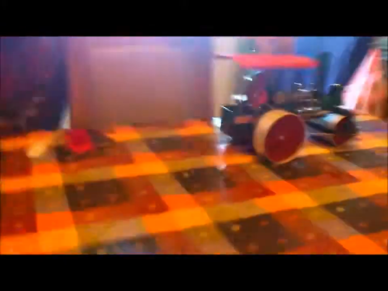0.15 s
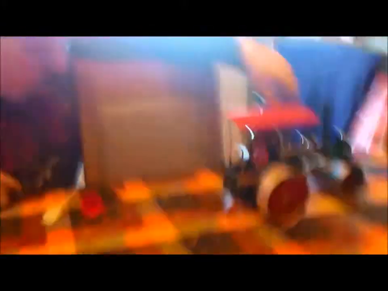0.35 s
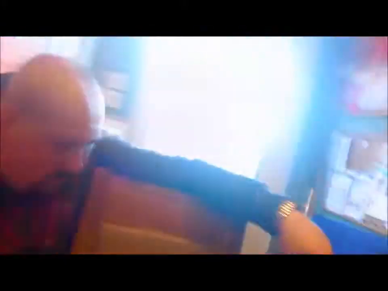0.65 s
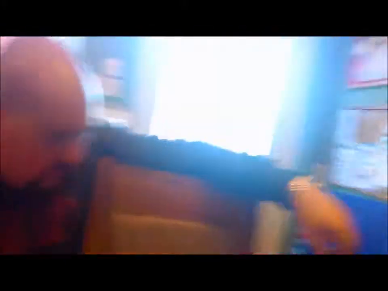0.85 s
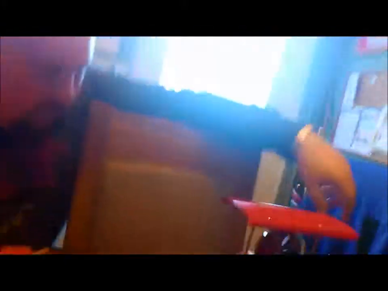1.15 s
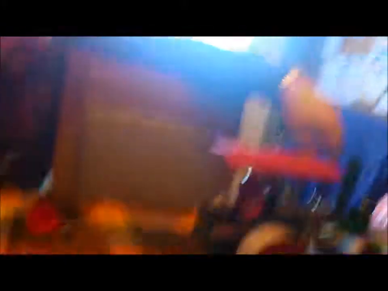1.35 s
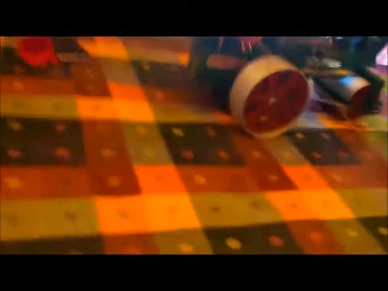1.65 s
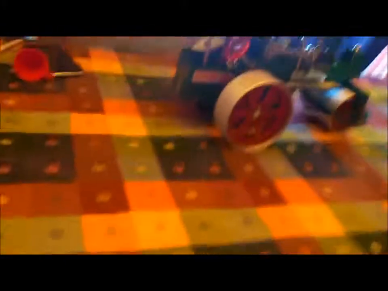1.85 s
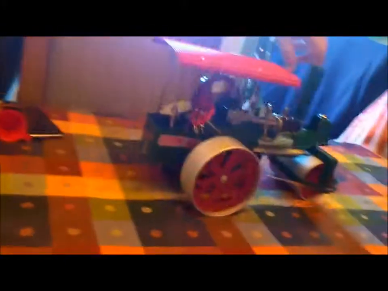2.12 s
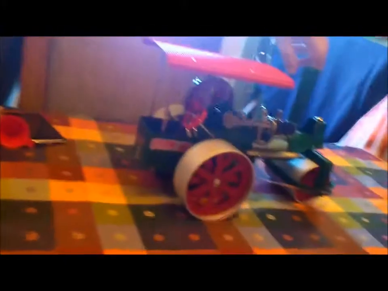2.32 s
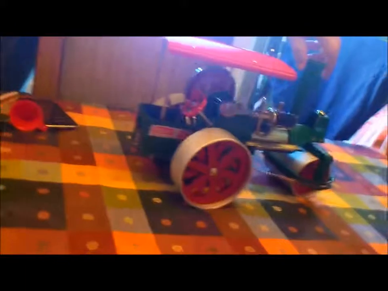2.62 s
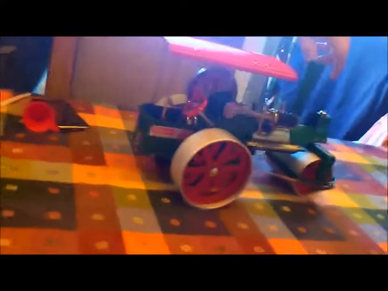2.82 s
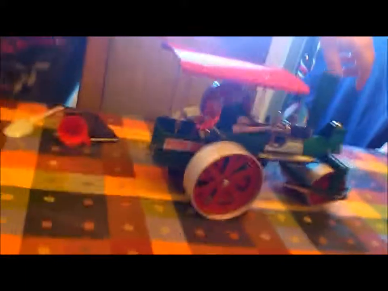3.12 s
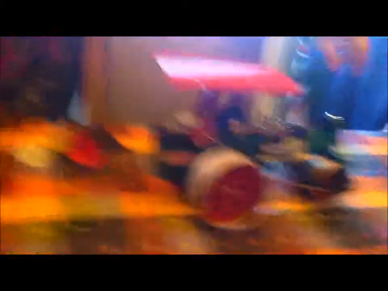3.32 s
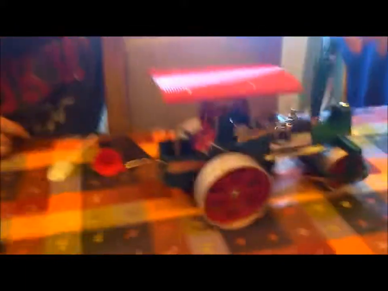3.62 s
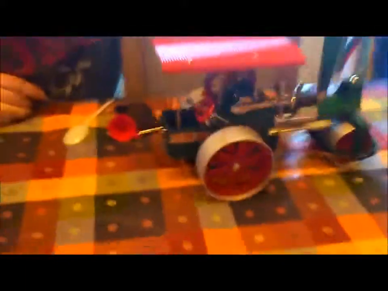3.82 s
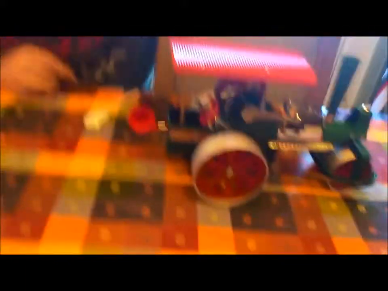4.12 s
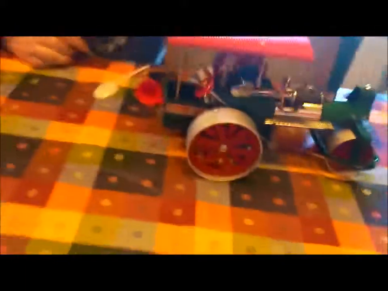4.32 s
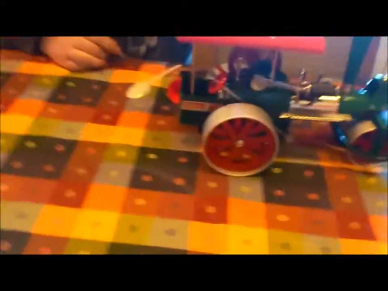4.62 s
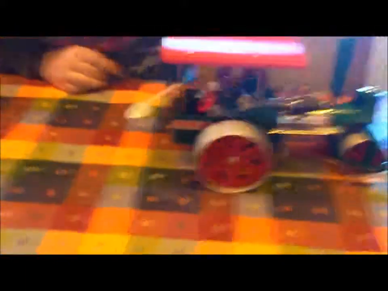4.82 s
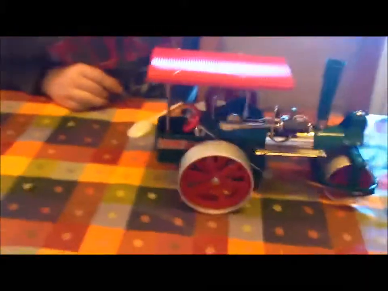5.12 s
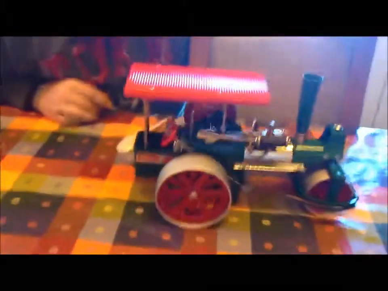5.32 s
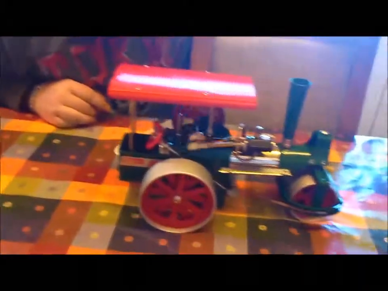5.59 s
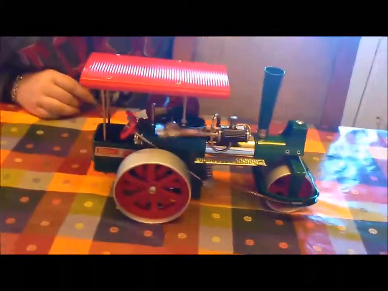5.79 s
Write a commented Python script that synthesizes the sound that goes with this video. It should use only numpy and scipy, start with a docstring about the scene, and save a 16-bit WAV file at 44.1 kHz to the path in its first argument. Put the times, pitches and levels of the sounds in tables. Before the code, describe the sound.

Fast tinny gear chatter, light clinks and a sputtering hiss from a small model steam engine running indoors.

```python
"""A small room: a toy steam roller runs on a cloth-covered table, slowly gaining speed.
Gear teeth chatter into its tin frame, a loose steel part jingles near 8.6 kHz, steam hisses thinly.
All three rise and fall as the big wheel binds once a turn; at times the gears clack, catch or run free.
Level, pan and the rings of the tin shift as the listening point moves round the engine.
Dull bumps and soft rubs sound through the table, over a faint room rumble."""
import sys
import numpy as np
from scipy import signal
from scipy.fft import rfft, irfft
from scipy.io import wavfile

SR = 44100
rng = np.random.default_rng(int(sys.argv[2]) if len(sys.argv) > 2 else 0)


def master(y):
    """Save y as 16-bit WAV."""
    cut = np.clip(np.atleast_2d(y).T, -1, 1)
    pcm = np.round(cut * 32767)  # scale
    wavfile.write(sys.argv[1], SR, pcm.astype(np.int16))


N = 262395
TIME = np.arange(N) / SR
WHEEL_TEETH, TIGHT_TOOTH = 78.5, 70


# gears catching: start_s, length_s, chatter_db, clatter_db
CATCHES = [(.361, 0.033, 4, -2), (.505, 0.08, -4, -4), (0.718, 0.045, 2, 4), (0.886, 0.045, 1, 2),
           (1.049, 0.047, 4, -0.5), (1.134, 0.03, 1, 6.5), (1.319, 0.051, 3, -1.5), (1.425, 0.045, 4, -2),
           (1.668, 0.065, 0.5, 2), (1.814, 0.062, 4, 3), (2.673, 0.036, 3, 0), (2.98, 0.019, 3.5, 2),
           (3.42, 0.046, 0.5, -0.5), (4.144, 0.024, 1.5, -4), (4.91, 0.037, 1.5, 3), (5.475, 0.03, 1, 3),
           (5.7, 0.069, 3, 1)]

def gears(turn_db, near_db, lull_db, pan_db):
    """Tooth blows ring the tin: bright chatter over low clatter, both changing level at a catch."""
    clicks = tooth_blows(jitter_s=0.0011, spread_db=3.2, rebound_db=-5, reach=0.7)
    tin = steadied(tin_frame(clicks), 1700, 5200, span_s=0.09)
    low = signal.sosfiltfilt(signal.butter(4, 1650, fs=SR, output="sos"), tin)
    scrape_db, knock_db = swells(CATCHES, attack_s=0.0027, release_s=0.031)
    chatter = (tin - low) * amp(-35.5 + near_db + scrape_db + flutter(depth_db=1, rate_hz=10.8))
    clatter = low * amp(-35 + 0.26 * near_db + knock_db + flutter(depth_db=1, rate_hz=10.2))
    return (chatter + clatter) * placed(turn_db - 0.3 * lull_db, pan_db)


# gear speed: time_s, teeth_per_s
GEAR_SPEED = [(0, 82), (.8, 87.5), (1.3, 92.5), (1.7, 93.7), (2.45, 96), (3.3, 98.7), (4.1, 101.5),
              (4.85, 103.7), (5.95, 106)]

def tooth_count():
    """Teeth met so far, per sample."""
    return np.cumsum(follow(GEAR_SPEED)[0]) / SR


def tooth_blows(jitter_s, spread_db, rebound_db, reach=1):
    """One blow and four rebounds per tooth, within reach (share of the gap); slack scatters them."""
    met = tooth_count()
    tooth = np.arange(int(met[-1]))
    meet_s = np.interp(tooth, met, TIME)
    tightness = 0.5 + 0.5 * np.cos(2 * np.pi * (tooth - TIGHT_TOOTH) / WHEEL_TEETH)
    slack = 1 - 0.75 * tightness
    blow_s = meet_s + jitter_s * slack * rng.standard_normal(len(tooth))
    blows = click_train(blow_s, amp(spread_db * rng.standard_normal(len(tooth))))
    rebound_s = meet_s[:, None] + reach * np.gradient(meet_s)[:, None] * rng.random((len(tooth), 4))
    sizes = amp(rebound_db + spread_db * rng.standard_normal(rebound_s.shape)) * np.sqrt(slack)[:, None]
    return blows + click_train(rebound_s.ravel(), sizes.ravel())


# one wheel turn from the tight spot: phase_turns, gear_db, steam_db, jingle_db
WHEEL_CYCLE = [(0, 1, -3.5, -0.5), (0.119, -0.5, -12, 2), (.22, -4.5, -5, -0.5), (0.329, -5.5, -12, 0),
               (.45, -4.5, -5, 3), (.57, -2.5, -0.5, 2.5), (.7, -1, -1.5, 5), (.82, -2, -3, 1.5),
               (.92, -0.5, -3.5, 1)]

def wheel_turn():
    """Gear, steam and jingle levels as the big wheel goes round."""
    phase, *columns = np.transpose(WHEEL_CYCLE)
    turns = (tooth_count() - TIGHT_TOOTH) / WHEEL_TEETH
    return [np.interp(turns, phase, column, period=1) for column in columns]


# tin spectrum: freq_hz, level_db
TIN_SPECTRUM = [(60, -24), (128, -14), (260, -12), (375, -14), (470, -8), (545, -6), (675, -9), (815, -6.5),
                (1620, -2.5), (1990, -2.5), (2320, 0.5), (2880, 2.5), (4500, -0.5), (5750, -3),
                (8000, -4.5), (12100, -13), (15100, -43)]
# tin resonances: pitch_hz, width_hz, boost_db
TIN_MODES = [(546, 19, 1.5), (785, 51, 3.5), (864, 76, 3.5), (980, 14, 0), (1145, 38, 2.5), (1197, 13, 5),
             (1391, 56, 6), (1860, 54, 2), (1950, 94, 5), (2097, 36, 7.5), (2554, 71, 3), (2920, 150, 0.5),
             (2990, 50, 2), (3160, 19, 5.5), (3880, 110, 3)]
# tin balance: freq_hz, pan_db
TIN_PAN = [(200, 0.5), (800, 1.5), (1400, -0.5), (2600, 0), (4000, 2), (6500, 5), (9000, 11), (11500, 0.5)]

def tin_frame(clicks, positions=7):
    """Blows excite the frame; reflections crossfade from one listening position to the next."""
    position = (positions - 1) * TIME / TIME[-1]
    path_sets = [paths(crack_t60_s=0.033, room_db=3.5, room_t60_s=0.19, count=2)
                 for _ in range(positions)]
    cracks = np.zeros((2, N))
    for k, responses in enumerate(path_sets):
        fade = np.sqrt(np.maximum(1 - abs(position - k), 0))
        cracks += rattle(clicks * fade, responses)
    return shifting_rings(colour(cracks, TIN_SPECTRUM, TIN_MODES, TIN_PAN))


# brightest ring: time_s, pitch_hz, gain_db
SHEEN = [(0, 3380, -32), (.6, 3170, -15), (.85, 3240, 2.5), (1.2, 3370, -12), (2, 3100, -33),
         (3.2, 2800, -11), (3.45, 2830, 2), (3.6, 3900, -28), (3.75, 4700, -7), (4.15, 4940, 3),
         (4.5, 4440, -24), (4.9, 4800, 4), (5.2, 4440, -17), (5.6, 4260, 0), (5.95, 4230, -20)]
# tin and table rings: time_s, bright_db, middle_db, hollow_db, side_db, table_db
RING_GAINS = [(0, -4, -12, -2, -25, -3), (.5, 1, -10, -9, -31, 0), (.8, -25, -29, -9, -27, 9.5),
              (1.15, -12, -33, -16, -25, 15), (1.4, -1, -4, -4, -25, 10), (2.4, 3.5, 0, -8, -26, 9),
              (3.2, -4, -5.5, -7, -6, 13), (3.75, 0.5, -11, -4, -8, 6), (4.2, -0.5, -28, 6, 6, 10),
              (4.75, 3.5, -23, 6, -1, 11), (5.2, 2, -8, 10, -1, 4), (5.95, 4, 2, 6, 4.5, 1)]
# tin roof ring: time_s, gain_db
ROOF_GAIN = [(.45, -35), (.75, -5), (.95, -2), (1.3, -23)]
# rings heard beside the frame: pitch_hz, width_hz, gain_db
SIDE_MODES = [(1145, 150, -0.5), (2062, 40, -3), (2780, 59, 2), (4020, 140, -5.5), (4300, 110, -9)]

def shifting_rings(tin):
    """Resonances of tin and table come and go with the listening position."""
    sheen_hz, sheen_db = follow(SHEEN)
    bright_db, middle_db, hollow_db, side_db, table_db = follow(RING_GAINS)
    tin = (tin + amp(sheen_db) * resonate(tin, sheen_hz, width_hz=430)
           + amp(bright_db) * resonate(tin, 2024, width_hz=160)
           + amp(middle_db) * resonate(tin, 810, width_hz=170)
           + amp(hollow_db) * resonate(tin, 562, width_hz=51)
           + amp(table_db) * resonate(tin, 160.6, width_hz=24.4)
           + amp(follow(ROOF_GAIN)[0]) * resonate(tin, 1470, width_hz=190)
           + sum(amp(side_db + db) * resonate(tin, hz, width_hz) for hz, width_hz, db in SIDE_MODES))
    notch_depth = 0.21 * np.minimum(amp(side_db), 1)
    return tin - notch_depth * resonate(tin, 3390, width_hz=290)


# tooth jumps: start_s, level_db
CLACKS = [(0.057, -21), (0.367, -43), (0.5118, -18.5), (0.523, -21.5), (0.6056, -29), (0.8275, -18.5),
          (0.894, -23), (1.0527, -24), (1.3224, -13), (1.427, -23), (1.4574, -15.5), (1.4825, -17.5),
          (1.556, -22), (1.6752, -16.5), (1.728, -22), (1.8343, -24), (2.981, -19), (3.1875, -22),
          (3.307, -29), (3.4485, -22), (4.144, -17), (4.3625, -20), (4.7645, -18), (5.4877, -17.5),
          (5.601, -14), (5.7152, -23), (5.9379, -34)]
# extra tin resonances in a clack: pitch_hz, width_hz, boost_db
CLACK_MODES = [(2850, 64, 6.5), (3960, 90, 3), (4330, 90, 3)]

def clacks(pan_db, trim_db):
    """A tooth jumps and cracks against the next: a dry, bright blow on the tin."""
    out = np.zeros((2, N + SR))
    cracks = paths(crack_t60_s=0.018, room_db=-5, room_t60_s=0.32, count=len(CLACKS))
    for (start_s, level_db), crack in zip(CLACKS, cracks):
        ring = colour(crack, TIN_SPECTRUM, TIN_MODES + CLACK_MODES, size=2048)
        add_hit(out, band(ring, 1470, 7900), start_s, level_db + trim_db, pan_db)
    return out[:, :N]


# jingle tone, bright peak near 8.7 kHz, very faint filtered top above 14 kHz: freq_hz, level_db
JINGLE_TONE = [(3000, -50), (6000, -19.5), (7900, -12.5), (8700, 3), (9350, 1.5), (10200, -21.5),
               (12100, -17.5), (13350, -15), (14200, -48), (14700, -25), (15450, -27)]
# jingle peaks: pitch_hz, width_hz, boost_db
JINGLE_PEAKS = [(8500, 130, 10), (8605, 90, 12.5), (11170, 110, 4), (11650, 200, 3.5), (12695, 85, 17.5),
                (14612, 120, 11)]
# jingle balance: freq_hz, pan_db
JINGLE_PAN = [(5000, -4), (8500, 3.5), (9500, -5.5), (11000, 2.5), (15000, -14.5)]

def jingle(gain_db, pan_db, lift_s=0.013, dip_db=3):
    """The teeth shake a loose steel part; it dips in level as it lifts off its seat before a clink."""
    clicks = tooth_blows(jitter_s=0.0014, spread_db=2.8, rebound_db=-9)
    cracks = rattle(clicks, paths(crack_t60_s=0.01, room_db=-2, room_t60_s=0.089, count=4))
    steel = colour(cracks, JINGLE_TONE, JINGLE_PEAKS, JINGLE_PAN)
    steel = steadied(steel, 8200, 9450, span_s=0.055)
    lifts = [(start_s - lift_s, lift_s, dip_db) for start_s, _ in CLINKS]
    lift_db = swells(lifts, attack_s=0.01, release_s=0.002)[0]
    return steel * placed(-35 + gain_db - lift_db + flutter(depth_db=1.8, rate_hz=10.2), pan_db)


# hard drops of the steel part: start_s, level_db
CLINKS = [(0.152, -26), (0.203, -25), (0.2385, -29), (0.265, -25), (.453, -22.5), (.503, -26), (0.732, -21),
          (.8765, -17), (1.166, -30), (1.815, -23.5), (1.923, -29), (2.032, -32), (2.771, -26.5),
          (2.782, -23), (2.822, -22.5), (2.91, -19.5), (2.9388, -21), (3.387, -28), (3.4173, -19),
          (3.5748, -30), (3.612, -26), (3.972, -21.5), (4.1822, -25), (4.24, -20.5), (4.305, -20),
          (4.477, -22), (4.557, -24), (4.924, -20.5), (5.163, -23), (5.181, -22.5), (5.5802, -33),
          (5.614, -25), (5.818, -23.5), (5.835, -24), (5.892, -25), (5.932, -30)]

def clinks(pan_db, trim_db, t60_s=0.035, bounce_s=0.0125, tail_t60_s=0.12):
    """The steel part drops on its seat, buzzes and bounces once."""
    out = np.zeros((2, N + SR))
    t = np.arange(SR // 10) / SR
    bounce = (t > bounce_s) * amp(-8.5 - 60 * abs(t - bounce_s) / t60_s)
    envelope = amp(-60 * t / t60_s) + bounce + amp(-26 - 60 * t / tail_t60_s)
    for start_s, level_db in CLINKS:
        buzz = rng.choice([-1., 1.], (2, len(t))) * envelope
        ring = colour(buzz, JINGLE_TONE, JINGLE_PEAKS, JINGLE_PAN, size=2048)
        add_hit(out, ring, start_s, level_db + trim_db, pan_db)
    return out[:, :N]


# hiss spectrum: freq_hz, level_db
STEAM_SPECTRUM = [(1500, -20), (4500, 2.5), (6000, 3.5), (7300, 12), (9500, 13), (10500, 5), (12000, 4),
                  (13300, 3), (14200, -42), (15400, -74)]
# hiss balance: freq_hz, pan_db
STEAM_PAN = [(4000, 14.5), (6500, 9.5), (9000, 4), (11000, 1.5), (14000, -2)]
# added treble band: time_s, gain_db
STEAM_TREBLE = [(0, -8), (.35, -4), (.55, 1), (.95, -13), (1.4, -3), (2.2, -4), (3.05, -2), (3.8, -4),
                (4.6, -16), (5.3, -5), (5.95, -29)]
# spurts and one drop: start_s, length_s, change_db
SPURTS = [(.04, 0.023, 13), (.19, 0.066, 11), (.6, 0.081, 5.5), (.89, .07, 11.5), (1.02, 0.11, 0),
          (1.32, 0.085, 0), (2.24, 0.054, 3.5), (2.79, 0.057, 4.5), (3.4, 0.048, 9), (4.23, 0.12, -14),
          (4.91, 0.031, 12), (5.23, 0.038, 3.5), (5.85, 0.032, 11.5)]

def steam(gain_db, sputter_decay_s=0.0025):
    """Steam hisses and spurts, with a slight irregular sputter."""
    clicks = tooth_blows(jitter_s=0.00042, spread_db=5, rebound_db=11)
    sputter = signal.lfilter([1], [1, -np.exp(-1 / (sputter_decay_s * SR))], clicks)
    flow = stereo(*rng.standard_normal((2, N))) * (unit_rms(sputter) + amp(-1))
    hiss = colour(flow, STEAM_SPECTRUM, pan=STEAM_PAN)
    hiss = hiss + amp(follow(STEAM_TREBLE)[0]) * resonate(hiss, 11200, width_hz=4300)
    spurt_db = swells(SPURTS, attack_s=0.0089, release_s=0.0093)[0]
    return unit_rms(hiss) * amp(-31.5 + gain_db + spurt_db + flutter(depth_db=2, rate_hz=11.3))


# blows on the table: start_s, level_db, centre_hz
BUMPS = [(0.056, -28, 310), (.088, -30.5, 420), (1.593, -25, 213), (1.609, -23.5, 140), (1.666, -35, 148),
         (2.401, -26, 230), (2.434, -36, 260), (3.093, -29, 185), (3.108, -28, 140), (3.167, -36.5, 150)]

def bumps(push_s=0.00094):
    """Each soft blow gives the table top a short push and rings its modes."""
    out = np.zeros(N + SR)
    age = np.arange(SR // 2) / SR / push_s
    for start_s, level_db, centre_hz in BUMPS:
        push = band(age * np.exp(1 - age), 0.29 * centre_hz, 700)
        bump = table_ring(centre_hz) + amp(-10) * push
        out[round(start_s * SR):][:len(bump)] -= amp(level_db) * bump
    return out[:N]


# rubs on the cloth: start_s, length_s, level_db, centre_hz
RUBS = [(.2, 0.043, -50, 420), (1.015, .08, -50.5, 160), (2.03, 0.12, -51, 270), (2.225, 0.087, -50, 222),
        (4.52, 0.037, -52.5, 157), (4.66, 0.066, -52, 158)]

def rubs():
    """Friction on the cloth swells and fades, stirring the table modes."""
    out = np.zeros(N + SR)
    for start_s, length_s, level_db, centre_hz in RUBS:
        size = int(length_s * SR)
        friction = rng.choice([-1., 1.], SR // 2)[:size] * signal.windows.hann(size)
        rub = signal.fftconvolve(friction, table_ring(centre_hz))
        out[round(start_s * SR):][:len(rub)] += amp(level_db) * rub / np.sqrt(np.sum(rub ** 2) / size)
    return out[:N]


# table top: pitch_hz, level_db, t60_s
TABLE_MODES = [(140, 9, 0.35), (155.5, 7, 0.34), (185, -1.5, 0.056), (230, 8, 0.063), (272.7, 2.5, 0.23),
               (328, -3, 0.057), (412, -4.5, 0.13), (460, -4, 0.13)]

def table_ring(centre_hz):
    """Decaying table modes, strongest near the pitch of the touch."""
    t = np.arange(SR // 2) / SR
    pitch_hz, level_db, t60_s = np.transpose(TABLE_MODES)[:, :, None]
    weight_db = level_db - 8 * np.log2(pitch_hz / centre_hz) ** 2
    detune = rng.uniform(0.99, 1.01, pitch_hz.shape)
    modes = amp(weight_db - 60 * t / t60_s) * np.sin(2 * np.pi * pitch_hz * detune * t)
    ring = band(modes.sum(0), 0.67 * centre_hz, 620)  # a lighter touch moves less bass
    return ring / abs(ring).max()


# room noise: freq_hz, level_db
RUMBLE_SPECTRUM = [(16, -4), (36, -10), (72, -15.5), (142, -9.5), (310, -20), (1050, -51), (4100, -69)]

def room_rumble(level_db):
    """Steady low noise of the room."""
    noise = stereo(*rng.standard_normal((2, N)))
    return amp(level_db) * unit_rms(colour(noise, RUMBLE_SPECTRUM))


# left-right likeness: freq_hz, coherence
COHERENCE = [(60, 0.45), (130, 1), (290, 0.87), (640, 0.96), (1410, 0.69), (3100, 0.012), (6820, 0.21),
             (15000, 0.3)]

def stereo(a, b):
    """Left and right from two unrelated signals: alike in the bass, less so in the treble."""
    coherence = np.clip(at_freq(COHERENCE, np.fft.rfftfreq(len(a), 1 / SR)), 0, 1)
    mid = rfft(a) * np.sqrt((1 + coherence) / 2)
    side = rfft(b) * np.sqrt((1 - coherence) / 2)
    return irfft(np.array([mid + side, mid - side]), len(a))


def paths(crack_t60_s, room_db, room_t60_s, count):
    """One response per contact point: a short crack, then the room."""
    t = np.arange(SR // 5) / SR
    crack = unit_rms(amp(-60 * t / crack_t60_s))
    room = unit_rms(amp(-60 * t / room_t60_s) * (1 - np.exp(-t / 0.0017)))
    envelope = np.hypot(crack, amp(room_db) * room)
    return [unit_rms(stereo(*(rng.choice([-1., 1.], (2, len(t))) * envelope))) for _ in range(count)]


def rattle(clicks, responses):
    """Sends each click down a random path."""
    out = np.zeros((2, N + SR))
    path = rng.integers(0, len(responses), N)
    for at in np.flatnonzero(clicks):
        response = responses[path[at]]
        out[:, at:at + response.shape[1]] += clicks[at] * response
    return out[:, :N]


def click_train(times_s, sizes):
    """Single-sample clicks."""
    at = np.round(times_s * SR).astype(int)
    inside = (at >= 0) & (at < N)
    return np.bincount(at[inside], sizes[inside], N)


def add_hit(out, ring, start_s, level_db, pan_db):
    """Mixes in a peak-normalised ring, panned as at its start."""
    at = round(start_s * SR)
    gains = placed(level_db, pan_db[at])[:, None]
    out[:, at:][:, :ring.shape[1]] += gains * ring / abs(ring).max(1, keepdims=True)


def colour(x, spectrum, modes=(), pan=((1000, 0),), size=16384):
    """Minimum-phase stereo filter: broad spectrum plus resonances."""
    hz = np.fft.rfftfreq(size, 1 / SR)
    peaks = 1 + sum((amp(abs(db)) ** 2 - 1) / (1 + (2 * (hz - pitch_hz) / width_hz) ** 2)
                    for pitch_hz, width_hz, db in modes)
    log_gain = np.log(amp(at_freq(spectrum, hz)) * np.sqrt(peaks) * panned(at_freq(pan, hz)))
    mirrored = np.hstack([log_gain, log_gain[:, -2:0:-1]])
    transfer = np.exp(np.conj(signal.hilbert(mirrored)))
    impulse = irfft(transfer[:, :len(hz)])[:, :size // 2]
    return signal.oaconvolve(x, impulse, axes=1)[:, :x.shape[1]]


def resonate(x, hz, width_hz):
    """Unity-gain resonance, steady or gliding."""
    r = np.exp(-np.pi * width_hz / SR)
    if np.ndim(hz) == 0:
        return signal.lfilter([1 - r, 0, r - 1], [1, -2 * r * np.cos(2 * np.pi * hz / SR), r * r], x)
    carrier = np.exp(2j * np.pi * np.cumsum(hz) / SR)
    return 2 * (carrier * signal.lfilter([1 - r], [1, -r], x / carrier)).real


def band(x, lo_hz, hi_hz):
    """Band-pass."""
    return signal.sosfilt(signal.butter(2, [lo_hz, hi_hz], "band", fs=SR, output="sos"), x)


def steadied(x, lo_hz, hi_hz, span_s):
    """Holds one band near rms 1 over span_s; single blows still differ."""
    window = signal.windows.hann(int(span_s * SR))
    power = signal.oaconvolve(band(x, lo_hz, hi_hz) ** 2, window[None] / window.sum(), "same", axes=1)
    return x / np.sqrt(abs(power) + 0.01 * power.mean())


def swells(rows, attack_s, release_s):
    """Events rise, hold and fall: one dB curve per level column."""
    start_s, length_s, *columns = np.transpose(rows)[:, :, None]
    rise = (TIME - start_s) / attack_s
    fall = (start_s + length_s - TIME) / release_s
    envelope = np.clip(np.minimum(rise, fall) + 0.5, 0, 1)
    return [(column * envelope).sum(0) for column in columns]


def flutter(depth_db, rate_hz):
    """Random level wobble in dB."""
    ratio = np.fft.rfftfreq(N, 1 / SR) / rate_hz
    shape = ratio / (1 + ratio ** 4)
    return depth_db * unit_rms(irfft(rfft(rng.standard_normal(N)) * shape, N))


def follow(rows):
    """One time curve per value column."""
    time_s, *columns = np.transpose(rows)
    return [np.interp(TIME, time_s, column) for column in columns]


def at_freq(points, hz):
    """Interpolates over log frequency."""
    freq_hz, value = np.transpose(points)
    return np.interp(np.log(hz + 1), np.log(freq_hz), value)


def placed(level_db, pan_db):
    """Constant-power stereo gains."""
    gains = panned(pan_db)
    return 2 * amp(level_db) * gains / np.hypot(*gains)


def panned(pan_db):
    """Stereo gains; pan_db is left minus right."""
    return amp(np.array([pan_db, -pan_db]) / 2)


def unit_rms(x):
    """Scales to rms 1."""
    return x / np.sqrt(np.mean(x ** 2) + 1e-20)


def amp(db):
    """dB to gain."""
    return 10 ** (np.asarray(db) / 20)


# listening point round the engine: time_s, near_db, gear_pan_db, jingle_pan_db
LISTENING_PATH = [(0, -7.5, -2.5, 7), (.34, -6, -1.5, 10), (.6, -0.5, -3, 1.5), (.9, -2, -2, 4),
                  (1.15, -3.5, -2, 7), (1.4, -0.5, -1, 6.5), (2.0, -1.5, -0.5, 8.5), (2.7, -1, -0.5, 12),
                  (3.6, -0.5, -2, 10.5), (4.1, 1.6, -1, 10), (4.8, 0.6, -1.2, 6.5), (5.4, 0, -0.5, 6.5),
                  (5.95, -2, 0, 11)]
# engine runs free, jingle and hiss dip most: start_s, length_s, depth_db
LULLS = [(.81, 0.04, 4.5), (1.24, 0.073, 3), (1.75, 0.022, 10), (1.85, 0.063, 8.5), (2.33, 0.052, 5),
         (2.715, 0.056, 8), (3.225, 0.03, 8), (3.355, 0.03, 9), (3.5, 0.079, 5.5), (4.17, 0.061, 6),
         (4.335, 0.047, 4.5), (4.98, 0.042, 4.5), (5.53, 0.038, 3), (5.765, 0.029, 11)]

def scene():
    """Engine, table and room."""
    gear_db, steam_db, jingle_db = wheel_turn()
    near_db, gear_pan_db, jingle_pan_db = follow(LISTENING_PATH)
    lull_db = swells(LULLS, attack_s=0.04, release_s=0.0039)[0]
    engine = (gears(gear_db, near_db, lull_db, gear_pan_db)
              + jingle(jingle_db + near_db - lull_db, jingle_pan_db)
              + clacks(gear_pan_db, trim_db=-2.5)
              + clinks(jingle_pan_db, trim_db=2.1)
              + steam(steam_db + near_db - lull_db))
    return engine + bumps() + rubs() + room_rumble(level_db=-59)


def record(dry):
    """Steep low-pass at 15.6 kHz."""
    lowpass = signal.firwin(511, 15600, window=("kaiser", 9), fs=SR)
    return signal.oaconvolve(dry, lowpass[None], "same")


dry = scene()
out = record(dry)
master(out)
```